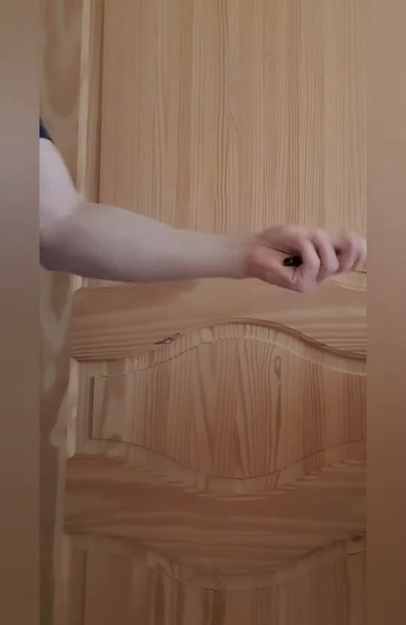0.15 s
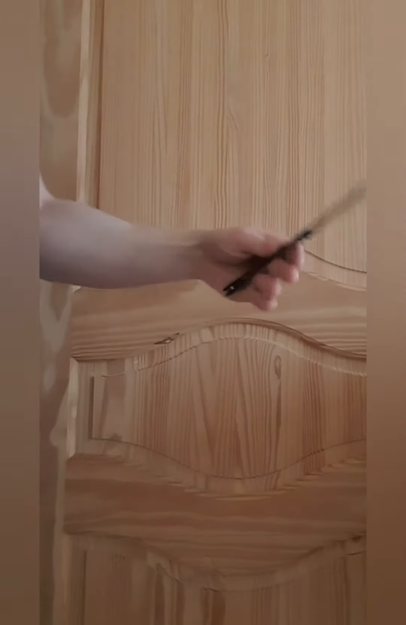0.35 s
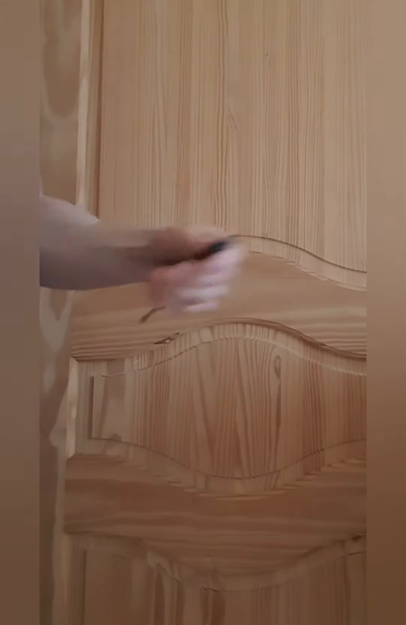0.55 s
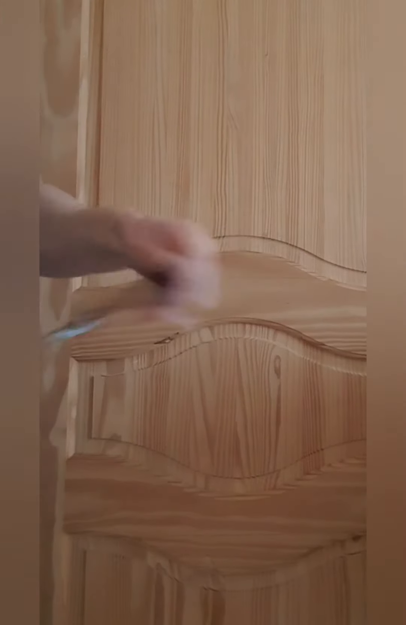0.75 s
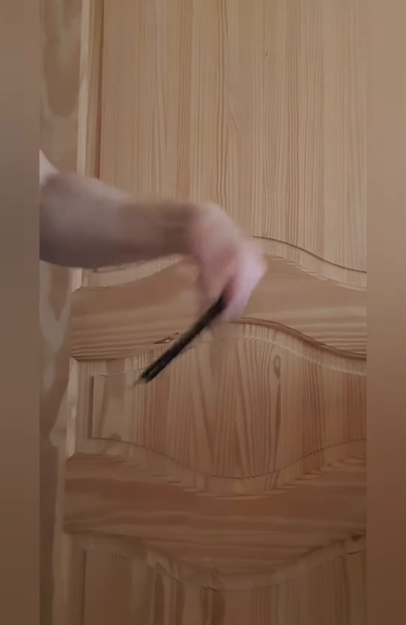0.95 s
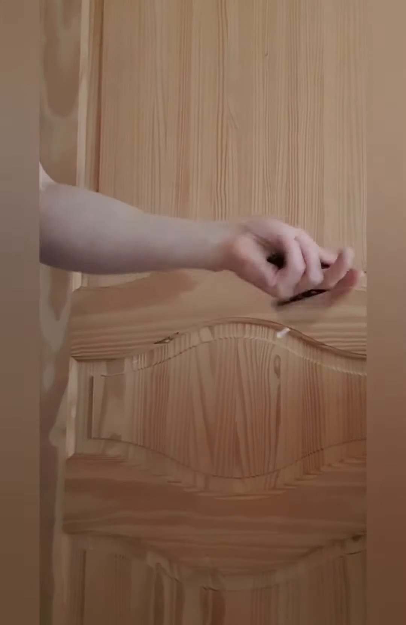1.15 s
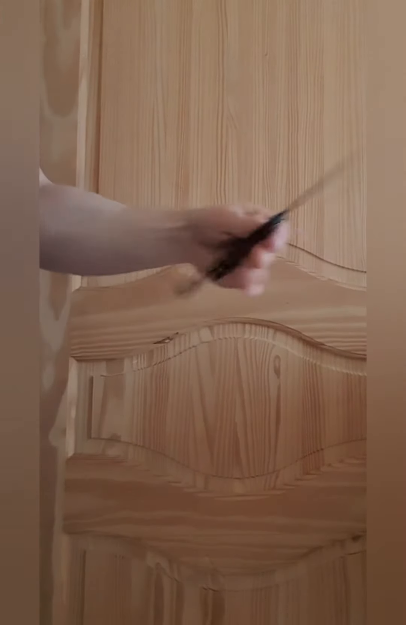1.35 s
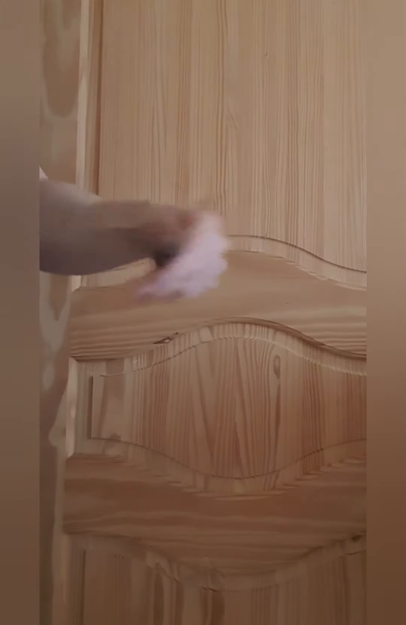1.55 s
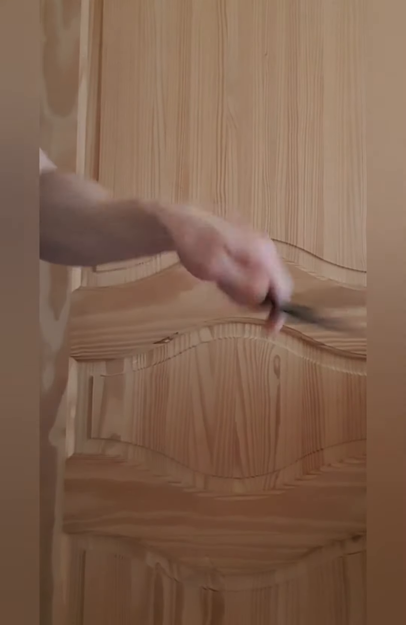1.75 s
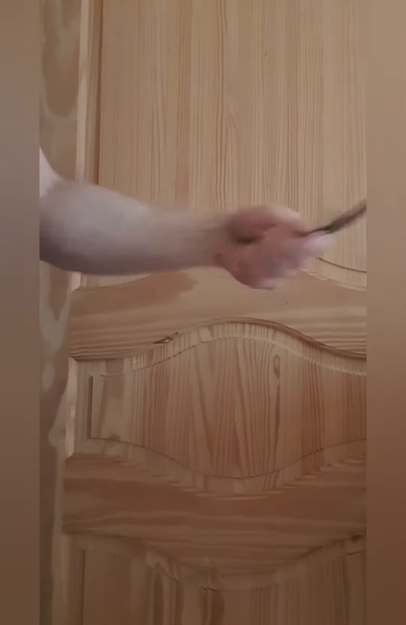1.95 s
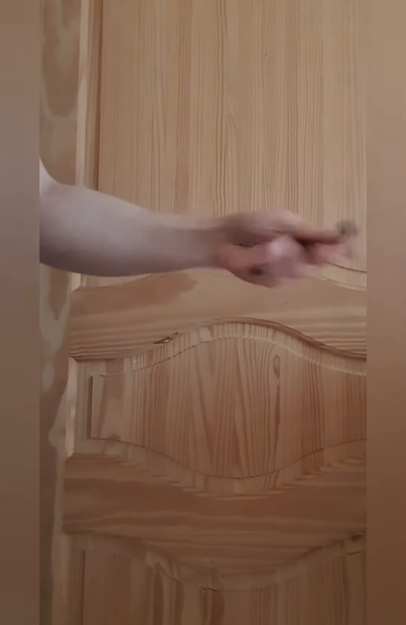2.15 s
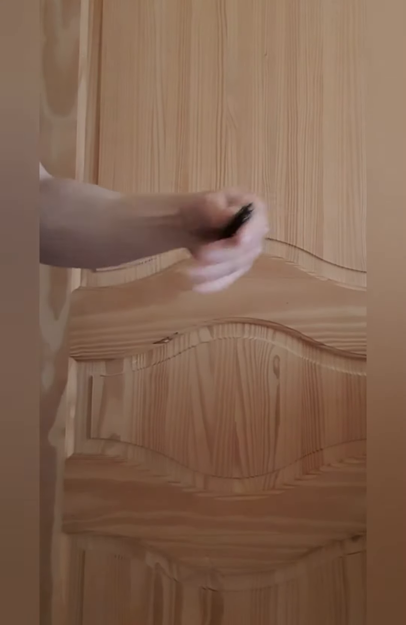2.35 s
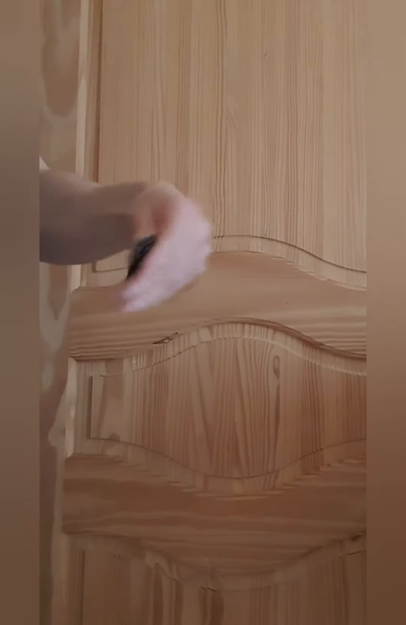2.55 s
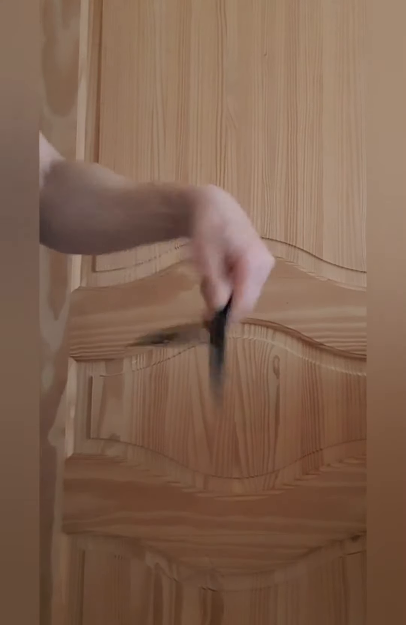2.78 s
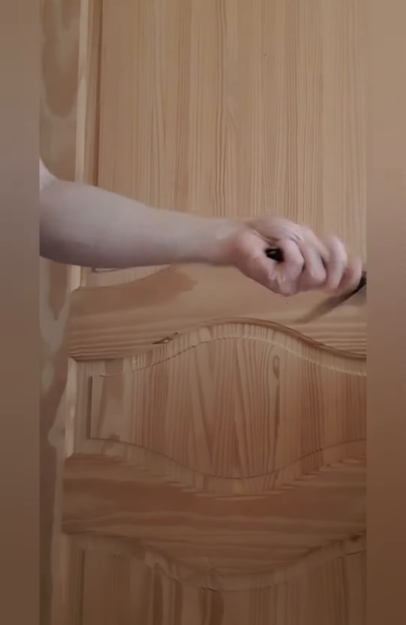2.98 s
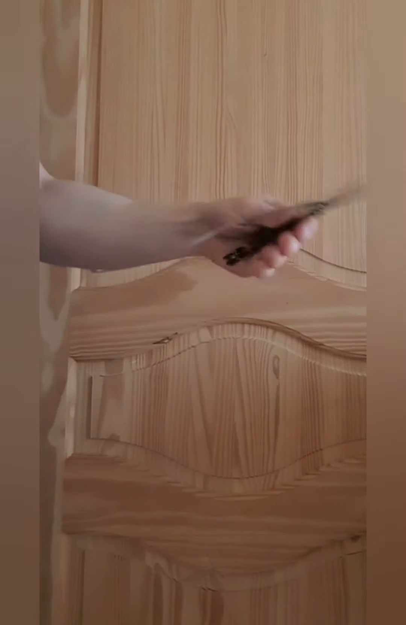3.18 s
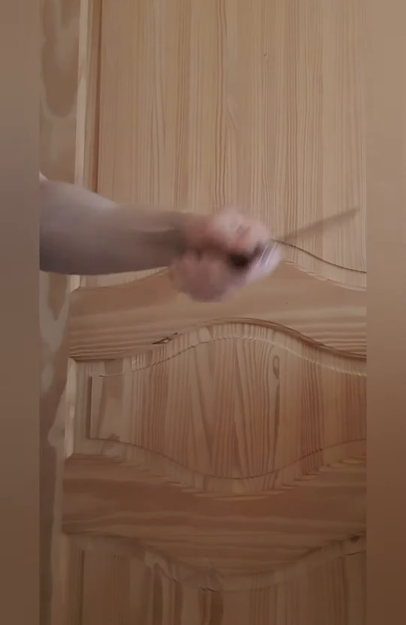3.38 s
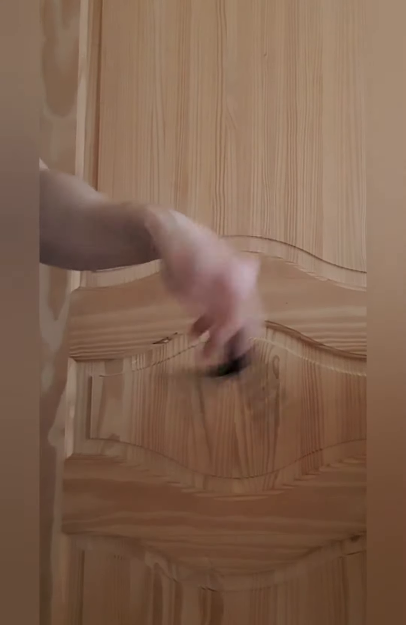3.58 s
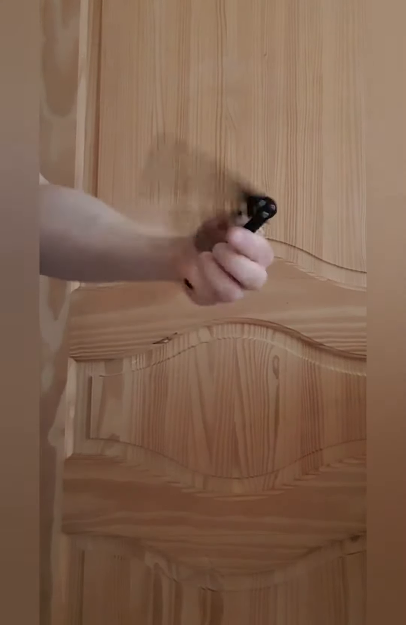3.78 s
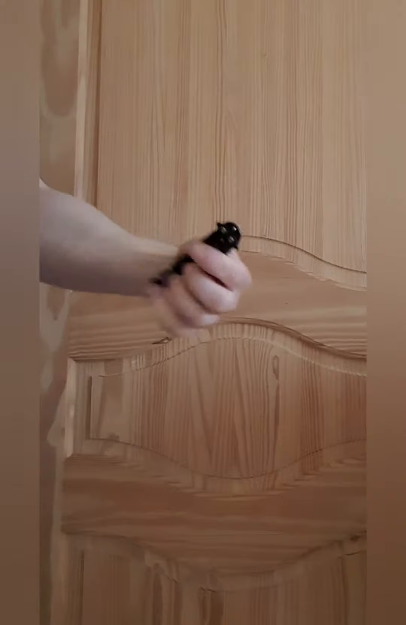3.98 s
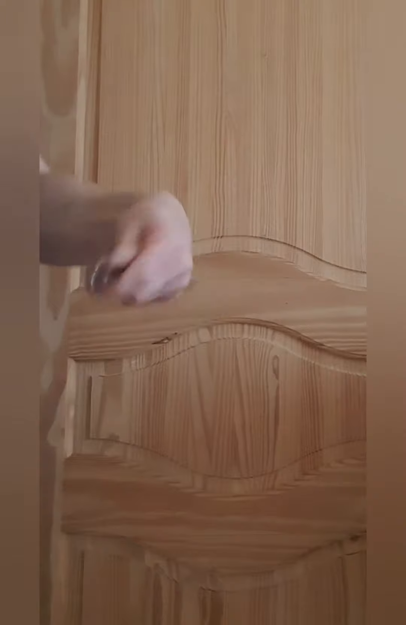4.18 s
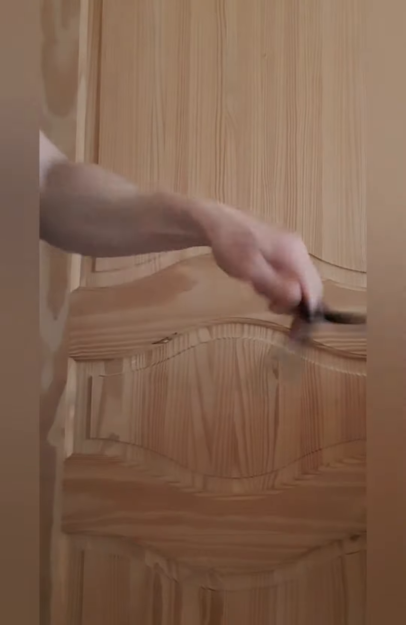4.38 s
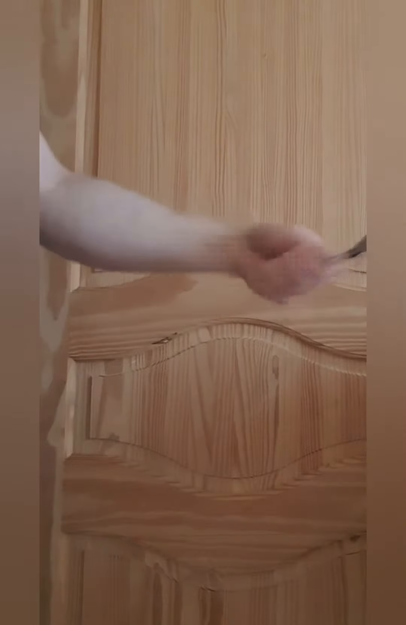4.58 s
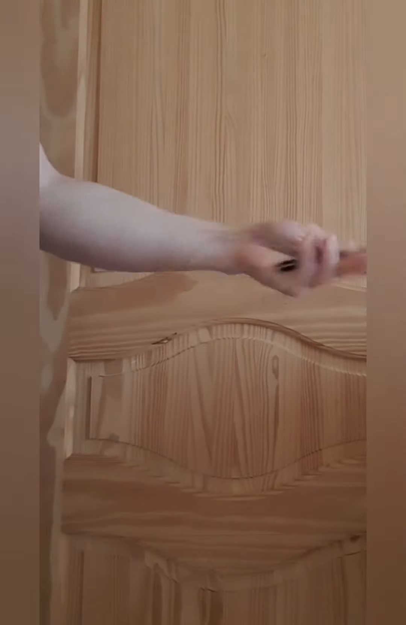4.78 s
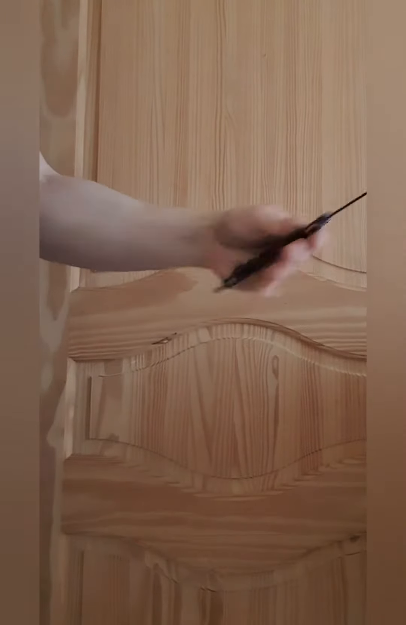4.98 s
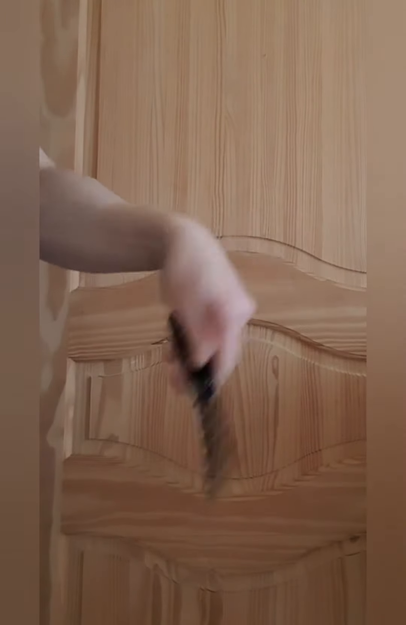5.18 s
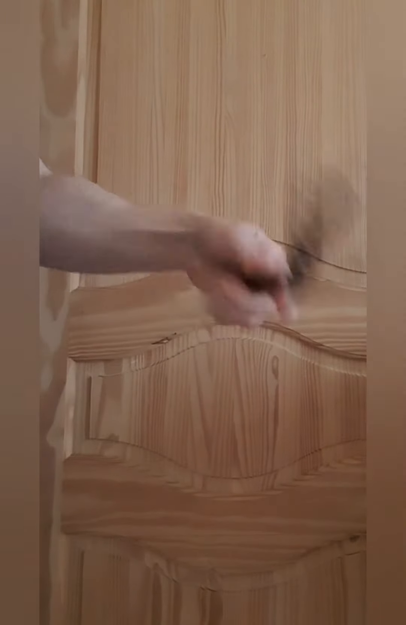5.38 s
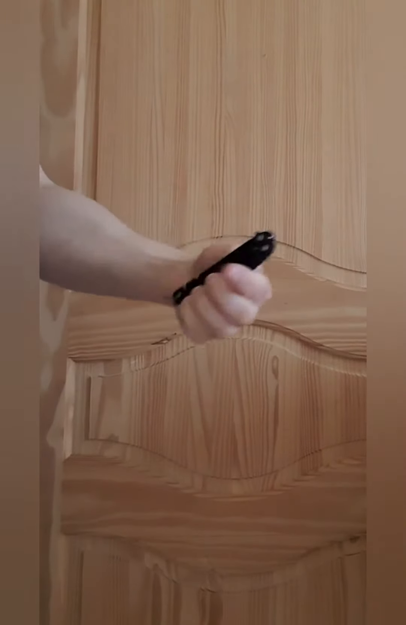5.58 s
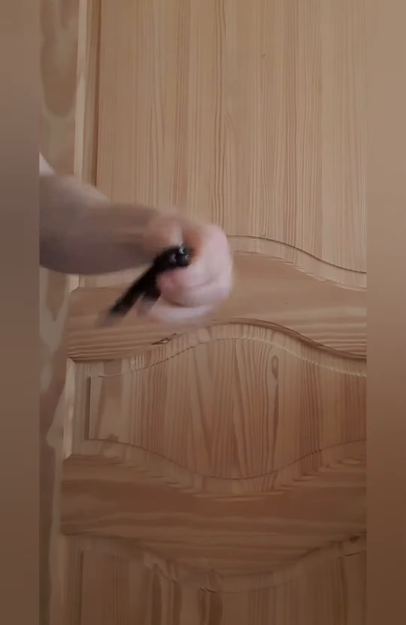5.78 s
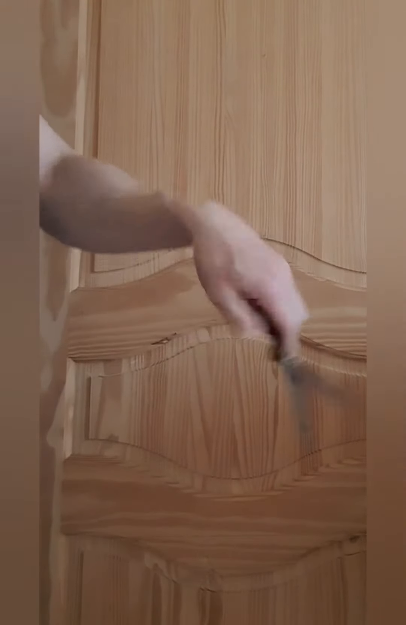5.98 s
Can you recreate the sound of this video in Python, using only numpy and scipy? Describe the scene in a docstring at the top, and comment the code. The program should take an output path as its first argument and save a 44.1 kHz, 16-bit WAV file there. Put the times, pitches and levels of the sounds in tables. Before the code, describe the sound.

A practice butterfly knife is flipped in a small furnished room, its metal handles clacking sharply in irregular bursts over a low wavering hum.

```python
"""A practice butterfly knife is flipped by hand in a small furnished room, over a wavering hum and hiss.
It starts with quick clacks and palm slaps, then faint pivot rattles and strong clacks near 1.4, 2.4 and 3.3 s.
Around 4 s come light contacts and a long faint rattle, at 5 s a hard double clack, after 5.5 s a dense flurry.
Noise bursts ring the metal, tiny ticks make the rattle, soft thumps and knocks make the slaps;
filtered noise gives the room tail and the hiss, and narrow resonances give the hum."""
import sys
import numpy as np
from scipy import signal
from scipy.io import wavfile

SR = 44100
rng = np.random.default_rng(int(sys.argv[2]) if len(sys.argv) > 2 else 0)


def inscribe(sig):
    """Save sig as 16-bit PCM at rate SR to the path in sys.argv[1].

    A 1-D sig is mono; a 2-D sig holds one channel per row.
    Samples are clipped to [-1, 1] before scaling.
    """
    pcm = np.round(np.clip(np.atleast_2d(sig).T, -1, 1) * 32767)
    wavfile.write(sys.argv[1], SR, pcm.astype(np.int16))


N = 266364   # length in samples

# Room rumble and microphone hiss. Each row: pitch in Hz, relative strength in dB per Hz.
FLOOR_SPECTRUM = [(25, -30), (45, -6), (80, -12.5), (140, -11), (250, -24), (500, -26), (900, -33.5),
                  (1250, -41.5), (5000, -46.5), (10500, -50), (15500, -53)]
# How alike left and right are in that noise. Each row: pitch in Hz, likeness from 0 to 1.
FLOOR_LIKENESS = [(40, 0.77), (125, 0.94), (400, 0.43), (1200, 0.17), (12000, .1)]
# Wavering tones of the hum. Each row: pitch in Hz, width in Hz, rms level in dB before the stereo balance.
HUM_TONES = [(45.9, 7.7, -56.5), (63.7, 13, -60), (95.72, 4.5, -65), (194.5, 5.7, -77.5)]
# How the room tail dies. Each row: pitch in Hz, time to fall 60 dB in seconds (before the tail bend),
# relative level in dB, left-right likeness from 0 to 1.
ROOM_BANDS = [(150, 0.35, 12, 0.87), (565, 0.42, 19.5, 0.77), (1947, 0.33, -6.5, 0.11),
              (5184, 0.34, 0.5, 0.26), (10000, 0.29, -2.5, 0.27), (14800, 0.34, 3, 0.066)]
# Handles landing in the palm. Each row: time in seconds, knock level in dB before dulling,
# thump over knock in dB, knock pitch in Hz.
PALM_SLAPS = [(0.004, -45.5, -11, 600), (0.231, -48, 1, 396.6), (0.423, -37, -15.5, 785),
              (0.467, -38, -11, 390), (1.19, -40.5, -17.5, 790), (1.393, -37.5, -5.5, 815),
              (1.401, -33, -15.5, 990), (1.873, -48.5, -17, 804), (2.126, -35, -11, 600),
              (2.318, -46, -5, 810), (2.365, -38, -9.5, 730), (3.054, -50, -22.5, 840),
              (3.273, -29, -13, 925), (3.866, -52.5, 0, 517), (4.455, -46, -9.5, 610),
              (4.776, -30.5, -18.5, 820), (4.793, -36, -20, 390), (5.008, -31, -14.5, 956),
              (5.522, -56, 1, 789), (5.586, -59, 1, 500)]
# Flesh of the palm. Each row: pitch in Hz, relative level in dB, time to fall 60 dB in seconds.
FLESH_MODES = [(150, 7, 0.011), (278, 1, 0.012)]
# Loose pivots and latch shaken by a swing or a jolt. Each row: start in seconds, length in seconds,
# level in dB before the stereo balance.
RATTLE_SPELLS = [(.74, .12, -78.5), (.9, .1, -75.5), (1.185, .015, -57), (1.81, .03, -79), (1.88, .04, -68),
                 (2.59, .11, -77), (3.0, .04, -79), (3.055, .012, -52), (3.687, 0.045, -81),
                 (3.855, .015, -57.5), (4.0, .42, -85), (4.5, .1, -77), (4.715, .02, -78),
                 (4.775, .015, -53), (5.255, .03, -87), (5.38, .07, -81.5), (5.525, .06, -67),
                 (5.73, .08, -89.5), (5.985, .05, -73)]
# Modes (ringing pitches) of the knife, damped by the grip. Each row: pitch in Hz, relative level in dB,
# time to fall 60 dB in seconds.
KNIFE_MODES = [(1840, -15.5, 0.00091), (2500, -1.5, 0.0024), (2890, -18, 0.021), (3600, 0, 0.0025),
               (3980, -10, 0.025), (4520, -12, 0.013), (5500, -2.5, 0.0014), (6550, -2.5, 0.0043),
               (7200, -0.5, 0.0039), (7950, -4, 0.012), (8800, 3.5, 0.0032), (9700, 0, 0.005),
               (10550, -2, 0.0091), (11250, -4, 0.011), (12300, -2, 0.0031), (13600, -11, 0.002),
               (13650, -5, .003), (15300, -6, 0.0026)]
# Metal contacts. Each row: time in seconds, force level in dB, lowest modes in dB, low modes in dB,
# pitch in Hz of the mode the grip leaves free, left over right in dB (limited later), share sent into the room in dB.
METAL_CONTACTS = [(0.0012, -33.5, -1, 0, 2500, 6, 15), (0.2029, -27.5, 6.5, 1.5, 10550, 1, 5.5),
                  (0.2108, -33, -12, -2, 4520, 13, -1.5), (0.2453, -47.5, -1, 8, 3600, -9, 7),
                  (0.4242, -22.5, 0, -12.5, 3980, 3, 8), (0.467, -11.5, -5.5, -3.5, 3600, 3.5, 1.5),
                  (0.743, -53, -21, 0.5, 4520, 0, 7.5), (0.7737, -60, -18, 1.5, 4520, 5, 14),
                  (0.823, -53.5, -18, -5, 4520, 2, 7), (0.9038, -44.5, -33, 4, 6550, 3, 3.5),
                  (1.087, -66, -17, -14.5, 7950, 1.5, 3.5), (1.1827, -40.5, -7, 5.5, 2890, -10, 11.5),
                  (1.1899, -26, -5.5, -2.5, 2500, -2, 12), (1.204, -29.5, 5, -32, 7950, 12, 5.5),
                  (1.3641, -38, -14, -3.5, 3600, 8, 1.5), (1.3951, -14, -34, -7.5, 3600, 4, -2),
                  (1.4029, -18.5, -30, -4.5, 3600, 2, 0), (1.853, -48, 0.5, -14.5, 5500, 3, 2),
                  (1.869, -34, -14, -7.5, 11250, 13, 2), (1.8747, -40, 3, 0.5, 5500, -4, 15),
                  (2.0857, -35, 9, -2, 6550, 0, 9.5), (2.0937, -38, -20, -17, 8800, 2, 7),
                  (2.3183, -33.5, 1.5, 3.5, 4380, 1.5, 6), (2.356, -37.5, -34, -3, 3600, 0, 15.5),
                  (2.367, -15, -47, -1.5, 3600, 4.5, 0), (2.5924, -53, -26, -22, 9700, 7, 5.5),
                  (2.6486, -59, -14, -2, 4520, 5, 13.5), (2.7647, -44.5, -10, -1.5, 6550, 3.5, 2),
                  (3.0085, -57.5, 5, -16, 2500, 3, 9), (3.05, -35.5, 2.5, 5, 2500, -3.5, 15.5),
                  (3.0563, -18.5, 0, -7.5, 2890, 1, -0.5), (3.069, -23.5, -3, -4.5, 4520, 8, 3),
                  (3.2484, -51.5, 0, -2, 10550, 0, 7), (3.271, -10, -22, -7.5, 3980, 2, -1.5),
                  (3.678, -60, -5, -9.5, 2890, 7.5, 4), (3.689, -58.5, -10, -12.5, 5500, 9, 0.5),
                  (3.7744, -62, -18.5, -15, 5500, 9, 2), (3.83, -36, 6, -42, 8800, 2.5, 11.5),
                  (3.8664, -26.5, 1.5, -2.5, 5500, -4.5, 4.5), (3.9078, -38.5, 2.5, -12, 2500, 12, -7),
                  (3.993, -44.5, -8, -18, 3980, 11, 1.5), (4.046, -48.5, -26, -2, 5500, -2, 7),
                  (4.0581, -45.5, -35, -16, 3600, 12, 7), (4.0647, -40.5, -33, -16, 3600, 6, -7),
                  (4.1028, -43.5, -30, -7, 3980, 0, 2.5), (4.157, -59, -23, -3.5, 12300, 10, -0.5),
                  (4.1778, -49, -23, -24, 6550, 4, 3), (4.2687, -55, -31.5, -17.5, 6550, 4, 2),
                  (4.3424, -63.5, -15, -2.5, 4520, 2, 12.5), (4.3874, -59, -12, -1.5, 4520, 6, 3),
                  (4.4543, -32, -21, 3.5, 11250, 1.5, 9), (4.726, -61.5, -8.5, -15, 9700, 9, -2.5),
                  (4.76, -46, -19.5, -20.5, 6550, 15, 7.5), (4.772, -27, 1.5, -6, 6550, 3, 9),
                  (4.7787, -25, -10, -1.5, 4520, 6, 7), (4.9623, -40, -27, 1, 3600, 2, 4.5),
                  (4.9997, -14.5, -45, -7, 3600, 1.5, 1), (5.0082, -16.5, -32.5, -5.5, 3600, 9, -4),
                  (5.2585, -65, 3, 3, 4520, 6, 6.5), (5.377, -55, 6.5, -12.5, 7950, 4, 2.5),
                  (5.433, -59.5, -19, -13.5, 7200, 6, -0.5), (5.5035, -47, -24.5, -25, 8800, 2, 6),
                  (5.5228, -29, -5.5, -5, 8800, 4, 4), (5.533, -38, 4, -16, 8800, 16, -13),
                  (5.5467, -32.5, -1, 5, 10550, -1, 3), (5.5619, -36, 1, 0, 2890, 2, 9.5),
                  (5.572, -37, -4, 8.5, 2890, 6, 0.5), (5.588, -28, -2.5, 3.5, 7950, 2, -8),
                  (5.594, -28.5, -5, -5, 12300, 5, -1), (5.6443, -58, -17.5, -19, 3980, 5, -7),
                  (5.731, -59.5, -15, 0, 4520, 9, 1.5), (5.7897, -61, -14.5, -15.5, 9700, 8, 5.5),
                  (5.807, -66.5, -8, 11.5, 4520, -8.5, 1), (5.9382, -62.5, -2, -1, 2890, 1.5, 2),
                  (6.0132, -34, -2.5, -1.5, 3600, -1, 7)]

FLOOR_DB = -64.5   # rms, before the stereo balance
STEADY_HZ, STEADY_DB = 49.2, -54.5   # steady core of the hum: pitch, peak level before the stereo balance
TAIL_BEND_DB_PER_S2 = 399   # the tail dies ever faster as it sinks
KNOCK_T60_S, PALM_ROOM_DB = 0.009, -48
RATTLE_RISE_DB_PER_S, RATTLE_FALL_DB_PER_S = 802, 605
CHATTER_MS, HIGH_MODES_DB = 0.84, 0.5   # the same for every contact
BOUNCES_PER_S, BOUNCE_DB, BOUNCE_T60_S = 350, -11, 0.2   # loose parts keep touching after a contact
MODE_SHARE_DB = -22.5   # part of a contact's force that goes into one mode
SCATTER_DB = 1   # random strength of each mode at each contact
GRIPPED_DB, LONG_RING_S = -4, 0.02   # the grip mutes modes that ring longer than this, all but the free one
SMALL_BODY_HZ = 2050   # thin bars radiate little below this
LEFT_LEAD = 1   # samples by which the knife reaches the left microphone first
RUMBLE_CUT_HZ, TREBLE_FADE_HZ, CUTOFF_HZ = 38, 16100, 16900   # range: bass cut, treble fade, upper limit


def from_db(db):
    """Turn decibels into a plain multiplier."""
    return 10 ** (np.asarray(db) / 20)


def rms_one(x):
    """Scale a sound to an average (rms) strength of one."""
    return x / np.sqrt(np.mean(x ** 2) + 1e-20)


def at_hz(points, hz, column=1):
    """Read a table column at any pitch, with straight lines over log pitch."""
    table = np.array(points)
    return np.interp(np.log(hz), np.log(table[:, 0]), table[:, column])


def left_right(pan_db):
    """Gains for left and right that differ by pan_db; positive leans left."""
    return from_db(np.array([[0.5], [-0.5]]) * pan_db)


def ring(push, hz, t60):
    """A unit click sets a sine of about height 1 ringing; it falls 60 dB in t60 seconds."""
    shrink = from_db(-60 / (t60 * SR))
    turn = 2 * np.pi * hz / SR
    feedback = [1, -2 * shrink * np.cos(turn), shrink * shrink]
    return signal.lfilter([0, np.sin(turn)], feedback, push + 1e-18)   # the tiny offset avoids slow maths


def stereo_bands(length, likeness, gain):
    """Half-octave bands of stereo noise, each with its own likeness and gain at its pitch."""
    settle = 4000   # samples dropped while the filters settle
    edges = 25 * 2 ** np.arange(0, 9.6, 0.5)
    white = rng.standard_normal((2, 2, length + settle))
    out = 0
    for k, (low, high) in enumerate(zip(edges, edges[1:])):
        band = signal.butter(2, [low, high], "band", fs=SR, output="sos")
        mid, side = signal.sosfilt(band, white[k % 2])[:, settle:]   # neighbours use different noise
        hz = np.sqrt(low * high)
        alike = np.clip(likeness(hz), 0, 1)
        stereo = np.sqrt(1 + alike) * mid + np.sqrt(1 - alike) * side * [[1], [-1]]
        out = out + gain(hz) * stereo
    return out


def noise_floor():
    """Room rumble and microphone hiss: steady noise shaped band by band."""
    noise = stereo_bands(N, lambda hz: at_hz(FLOOR_LIKENESS, hz),
                         lambda hz: from_db(at_hz(FLOOR_SPECTRUM, hz)))
    return from_db(FLOOR_DB) * rms_one(noise)


def hum():
    """A steady tone, plus noise sent twice through narrow resonances, which makes wavering tones."""
    out = from_db(STEADY_DB) * np.sin(2 * np.pi * (STEADY_HZ * np.arange(N) / SR + rng.random()))
    for hz, width_hz, level_db in HUM_TONES:
        t60 = np.log(1000) / (np.pi * width_hz)
        noise = rng.standard_normal(N + SR)
        wavering = ring(ring(noise, hz, t60), hz, t60)[SR:]   # drop the first second of build-up
        out = out + from_db(level_db) * rms_one(wavering)
    return out


def room(x, first_s, build_s):
    """Dense reflections that start after the first wall and die band by band."""
    t = np.arange(int(0.6 * SR)) / SR
    onset = 1 - np.exp(-np.clip(t - first_s, 0, None) / build_s)
    bend = from_db(-TAIL_BEND_DB_PER_S2 * t ** 2)

    def decay(hz):
        """The plain fading of one band."""
        return from_db(at_hz(ROOM_BANDS, hz, column=2) - 60 * t / at_hz(ROOM_BANDS, hz))

    tail = onset * bend * stereo_bands(len(t), lambda hz: at_hz(ROOM_BANDS, hz, column=3), decay)
    return signal.fftconvolve(x[None], tail, axes=1)[:, :N]


def slaps(knock_t60):
    """Soft blows: the flesh thumps, the hollow of the fist knocks at a pitch set by the grip."""
    knocks, push = np.zeros(N), np.zeros(N)
    t = np.arange(int(0.05 * SR)) / SR
    for s, knock_db, thump_db, knock_hz in PALM_SLAPS:
        at = round(s * SR)
        push[at] = from_db(knock_db + thump_db)
        fade = from_db(knock_db - 60 * t / knock_t60)
        soft_start = np.tanh(t * knock_hz * 2)
        knocks[at:at + len(t)] += fade * soft_start * np.sin(2 * np.pi * knock_hz * t)
    thumps = sum(from_db(mode_db) * ring(push, hz, t60) for hz, mode_db, t60 in FLESH_MODES)
    return signal.lfilter([0.15], [1, -0.85], knocks + thumps)   # dulls the treble


def rattle(per_s, spread_db):
    """Tiny uneven ticks, each touching a random third of the modes, in spells that rise, hold and die away."""
    t = np.arange(N) / SR
    level = 0
    for s, length, db in RATTLE_SPELLS:
        rise_db = RATTLE_RISE_DB_PER_S * np.clip(s - t, 0, 1)
        fall_db = RATTLE_FALL_DB_PER_S * np.clip(t - s - length, 0, 1)
        level = level + from_db(db - rise_db - fall_db)
    heights = from_db(spread_db * np.minimum(rng.exponential(1, N), 3))
    ticks = heights * (rng.random(N) < per_s / SR)
    dealt = rng.integers(0, 3, N)   # which third of the modes a tick touches
    rings = 0
    for k, (hz, mode_db, t60) in enumerate(KNIFE_MODES):
        brighter_db = 2.0 * np.log2(hz / 4000)   # 2 dB more per octave
        rings = rings + from_db(mode_db + brighter_db) * ring(ticks * (dealt == k % 3), hz, t60)
    return level * rms_one(rings)


def knife(scatter_db, free_db, likeness):
    """Each contact chatters for a few ms and strikes every mode anew; returns stereo sound and room feed."""
    s, level_db, lowest_db, low_db, free_hz, pan_db, room_db = np.transpose(METAL_CONTACTS)
    peak = np.round(s * SR).astype(int)
    chatter = CHATTER_MS * SR / 1000   # in samples
    n = np.arange(N)
    begins = np.sort(peak - 2.5 * chatter)
    latest = np.clip(np.searchsorted(begins, n, "right") - 1, 0, None)   # contact in charge at each sample
    swell = np.exp(-0.5 * ((n - peak[latest]) / chatter) ** 2)
    since = (n - peak[latest]) / SR
    bounce = (rng.random(N) < BOUNCES_PER_S / SR) * (since > 0) * rng.exponential(1, N)
    swell = swell + bounce * from_db(BOUNCE_DB - 60 * since / BOUNCE_T60_S)

    # Thin bars radiate unevenly: the two microphones differ.
    mid, side = rng.standard_normal((2, N))
    grain = np.sqrt(1 + likeness) * mid + np.sqrt(1 - likeness) * side * [[1], [-1]]
    force = from_db(level_db[latest]) * swell * grain * left_right(np.clip(pan_db[latest], -8, 12))

    # The walls hear all directions: the chatter's colour averages out, so one click will do.
    blow = np.zeros(N)
    blow[peak] = from_db(level_db + room_db) * np.sqrt(chatter)

    scatter, phase = rng.standard_normal((len(s), 2, len(KNIFE_MODES))).transpose(1, 0, 2)
    out = 0
    for k, (hz, mode_db, t60) in enumerate(KNIFE_MODES):
        if hz < 3100:
            colour_db = lowest_db
        elif hz < 5200:
            colour_db = low_db
        else:
            colour_db = HIGH_MODES_DB if hz > 9300 else 0
        freed = np.exp(-0.5 * (np.log(hz / free_hz) / 0.04) ** 2)   # 1 at the free mode, 0 far from it
        grip_db = scatter_db * scatter[:, k] + GRIPPED_DB * (t60 > LONG_RING_S)
        grip_db = grip_db * (1 - 2 * freed)   # at the free mode the muting turns into a boost
        strength = from_db(mode_db + colour_db + free_db * freed + MODE_SHARE_DB + grip_db)
        pushes = np.vstack([force, blow * np.sign(phase[latest, k])])
        out = out + (-1) ** k * ring(pushes * strength[latest], hz, t60)
    out = signal.sosfilt(signal.butter(3, SMALL_BODY_HZ, "high", fs=SR, output="sos"), out)
    left, right, to_walls = out
    return np.array([left, np.roll(right, LEFT_LEAD)]), to_walls


def scene():
    """Mix the direct sounds, their room tails and the background."""
    clacks, to_walls = knife(scatter_db=SCATTER_DB, free_db=6, likeness=0.56)
    ticks = rattle(per_s=700, spread_db=5.5)
    palm = slaps(KNOCK_T60_S)
    direct = clacks + ticks * left_right(6.4) + palm * left_right(-5.0)
    metal_tail = room(to_walls + from_db(-8) * ticks, first_s=0.0005, build_s=0.00033) * left_right(3.7)
    palm_tail = room(palm, first_s=0.001, build_s=0.002) * left_right(-3.2)
    background = (noise_floor() + hum()) * left_right(-0.8)
    return direct + from_db(-31) * metal_tail + from_db(PALM_ROOM_DB) * palm_tail + background


def record(dry):
    """Limit the range: the deepest bass is cut, the highest treble fades, the top is cut at the upper limit."""
    dry = signal.sosfilt(signal.butter(3, RUMBLE_CUT_HZ, "high", fs=SR, output="sos"), dry)
    dry = signal.sosfilt(signal.butter(8, TREBLE_FADE_HZ, fs=SR, output="sos"), dry)
    return signal.sosfilt(signal.cheby2(10, 50, CUTOFF_HZ, fs=SR, output="sos"), dry)


dry = scene()
out = record(dry)
inscribe(out)
```